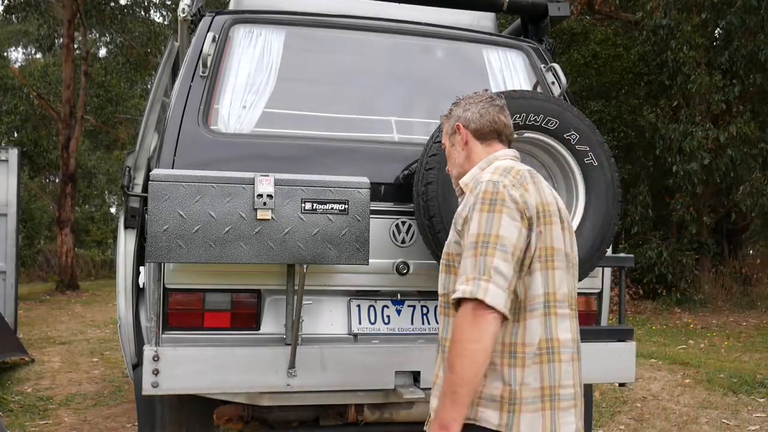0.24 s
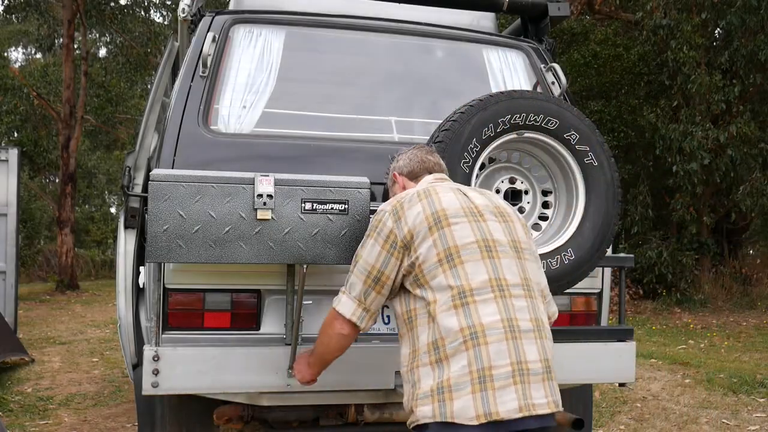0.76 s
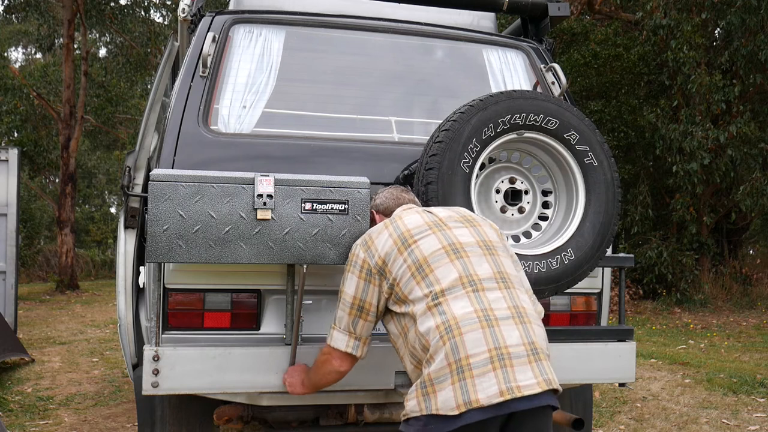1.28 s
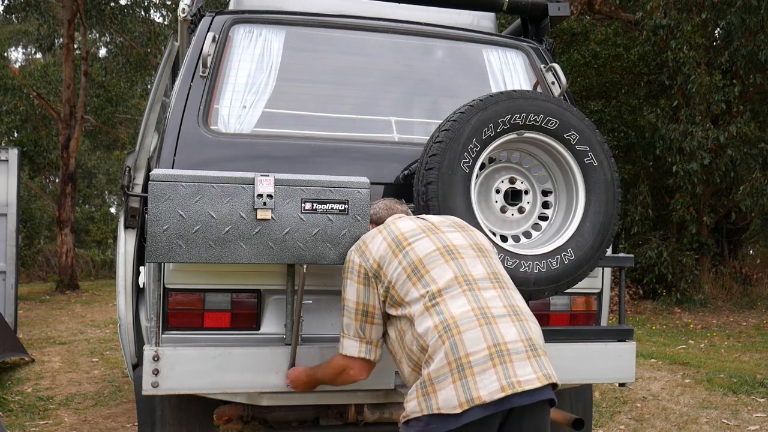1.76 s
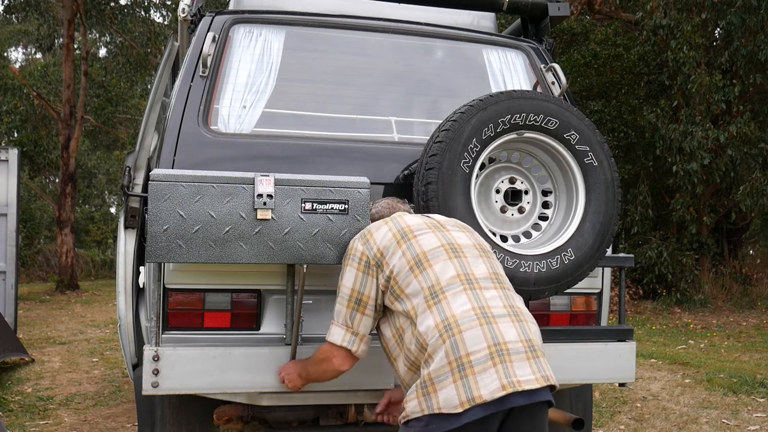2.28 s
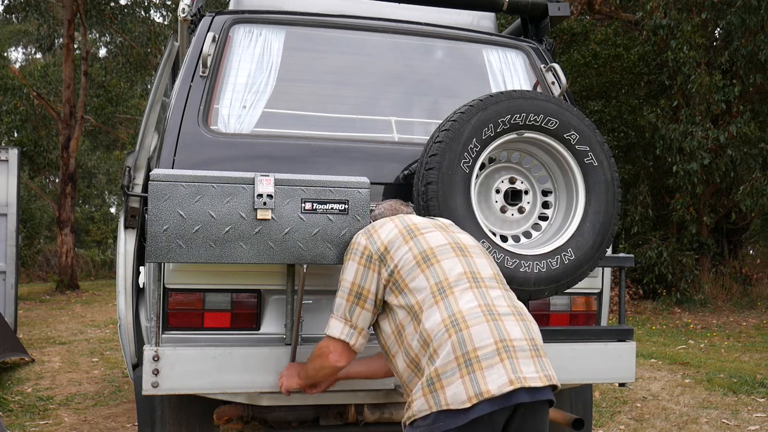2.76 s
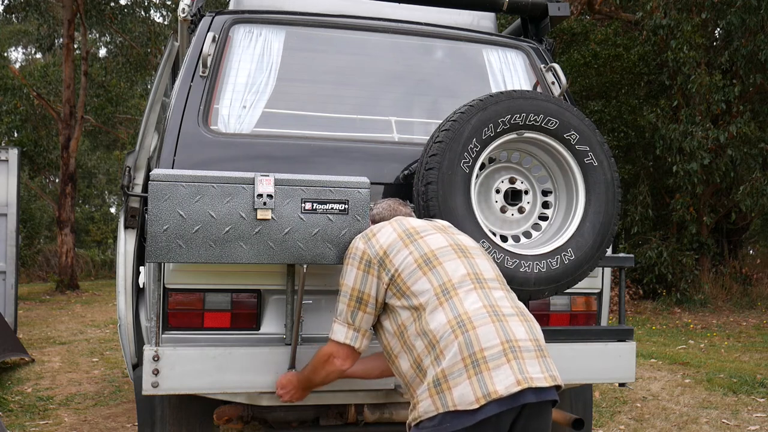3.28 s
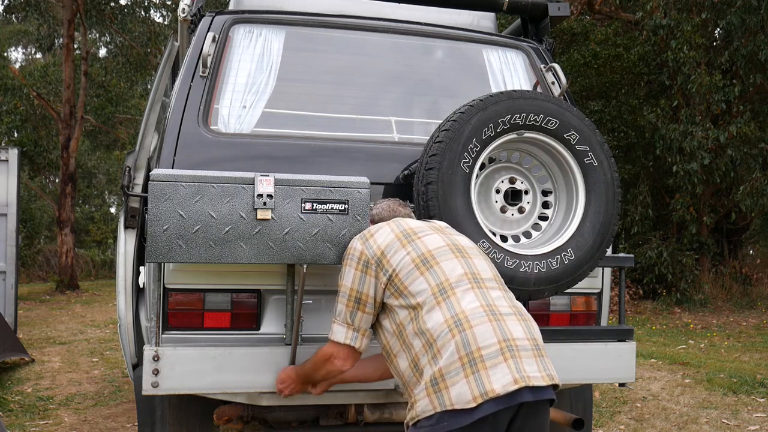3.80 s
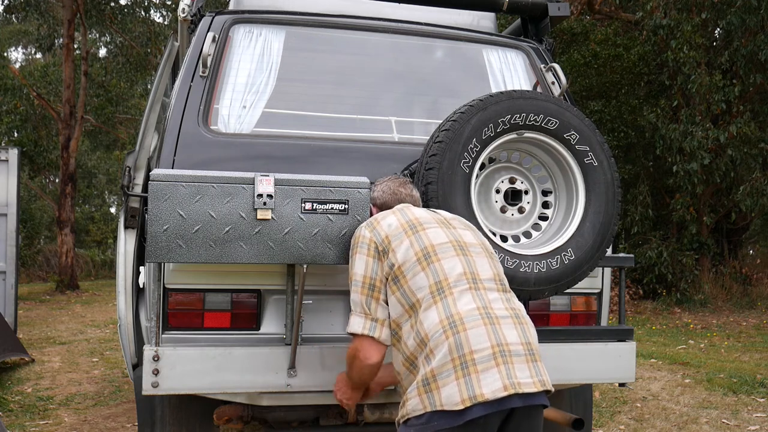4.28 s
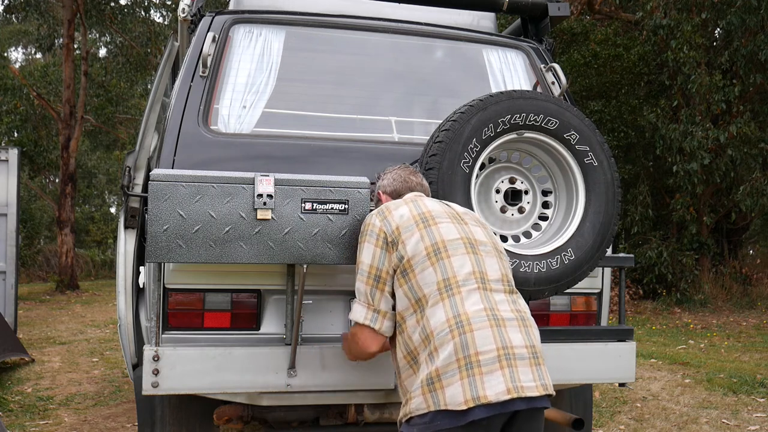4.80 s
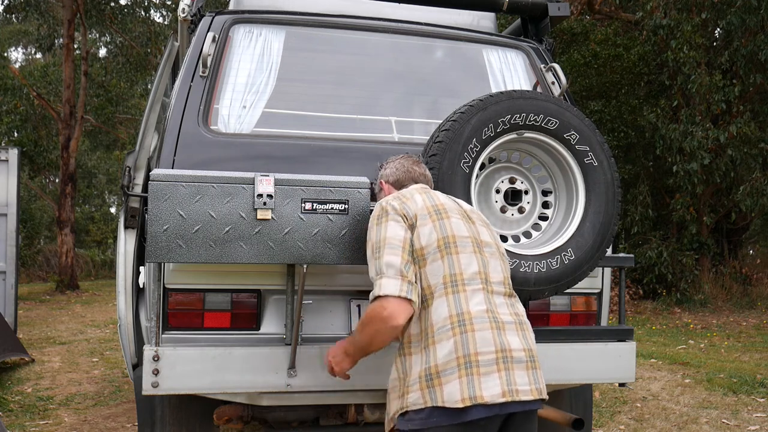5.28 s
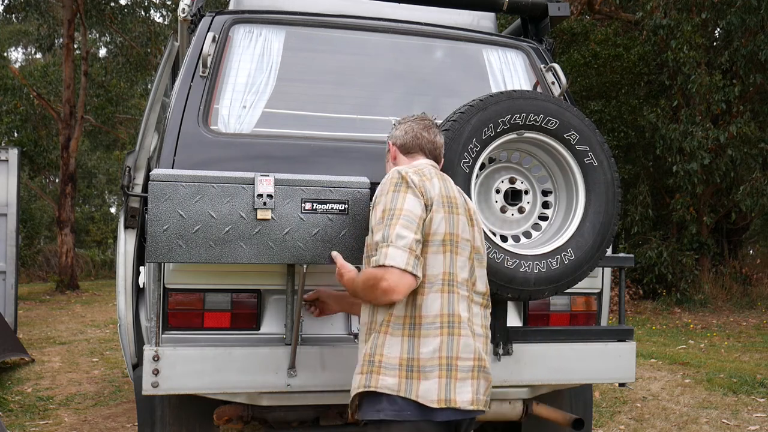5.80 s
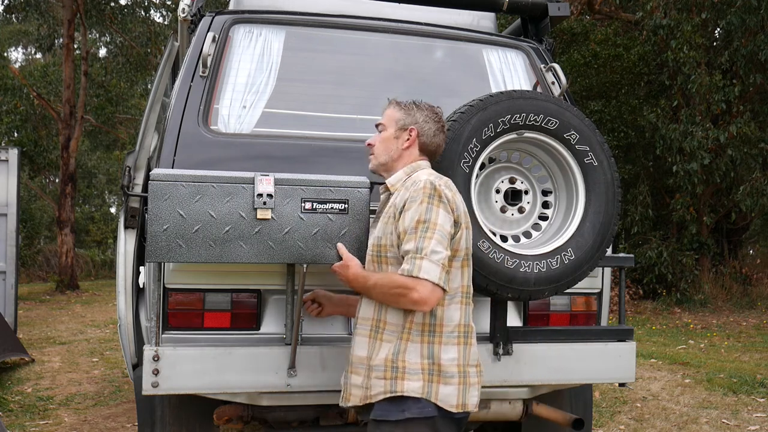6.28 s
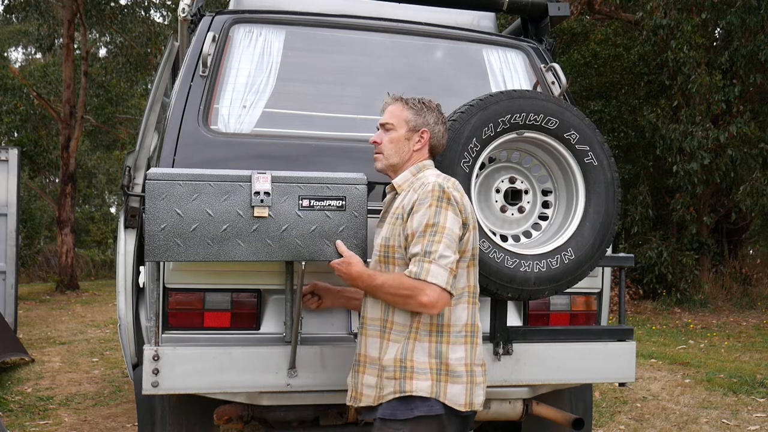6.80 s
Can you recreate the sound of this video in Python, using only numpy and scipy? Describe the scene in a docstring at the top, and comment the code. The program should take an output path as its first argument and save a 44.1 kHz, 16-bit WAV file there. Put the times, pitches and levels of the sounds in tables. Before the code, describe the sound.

Metal latch clicks and scrapes, then a steel swing frame clunks and rattles loose, with a bird chirping and faint insects outdoors.

```python
"""Outdoors behind a van, feet crunch through dry grass and a hand taps and brushes a hollow panel.
A steel latch ticks, from about 2 s its pin clicks and scrapes free, and at 5 s its handle snaps home.
Then a swing-away frame with a sheet-metal box clunks and rattles loose while the pin knocks again.
Each steel part rings when it is hit or rubbed. All along a small bird chirps and insects hiss
among the trees; a far bird whistles once, just before the handle snaps."""
import sys
import numpy as np
from scipy import signal
from scipy.fft import rfft, irfft
from scipy.io import wavfile
from scipy.ndimage import uniform_filter1d

SR = 44100
rng = np.random.default_rng(int(sys.argv[2]) if len(sys.argv) > 2 else 0)


def to_wav(sig):
    """Store sig (one row per channel, or 1-D mono) as 16-bit WAV at the path in sys.argv[1].

    Samples outside -1..1 are clipped; the rate is SR.
    """
    pcm = np.clip(np.atleast_2d(sig), -1, 1) * 32767
    pcm = np.round(pcm).astype(np.int16)
    wavfile.write(sys.argv[1], SR, pcm.T)  # frames by channels


N = 310905
TIME = np.arange(N) / SR


def swing_frame():
    """The tube frame and its sheet-metal box clunk and grind: low notes ring long, high ones die fast."""
    # blows on the frame: time_s, level_db, treble_db, bass_db
    blows = [(5.7, -11, -30, -9.5), (5.743, -17.5, -14.5, -3), (6.153, -31, -12, 1),
             (6.19, -24.5, -36, 3.5), (6.225, -29, -15, -14), (6.564, -23, -12, -25.5),
             (6.628, -21, -20, 0), (6.664, -17, -16, -5), (6.846, -9, -4.5, -20), (6.924, -12.5, -45, 13),
             (6.941, -10.5, -40, 7.5), (6.965, -13.5, -40, 13.5), (6.982, -8.5, -45, 6.5)]
    # rattling in its seat: peak_s, rise_s, hold_s, fall_db_per_s, level_db, treble_db, bass_db
    rattles = [(5.699, 0.011, 0.0012, 273, -24.5, -8.5, -10), (5.752, 0.056, 0.022, 127, -38, -13, 1.5),
               (5.875, 0.028, 0, 226, -42.5, -19, 4), (5.996, 0.022, 0.01, 900, -52.5, -27, 8.5),
               (6.062, 0.069, 0.0063, 246, -61, -8, 9), (6.156, 0.015, 0, 660, -39, -10, -2),
               (6.205, 0.042, 0.011, 163, -32.5, -10, 8), (6.307, .03, 0.016, 102, -46, -24, 9),
               (6.52, 0.028, 0.0018, 197.5, -29, -7, 2.5), (6.547, 0.036, 0.038, 397, -19.5, -8, -9),
               (6.577, 0.018, .005, 494, -19, 5, -5.5), (6.598, 0.079, 0.051, 105, -20, 2.5, -3.5),
               (6.868, 0.039, 0, 156, -17, -4, -1.5), (6.97, 0.1, 0.035, 100, -24, -5.5, 11.5)]
    # its clear ringing notes: pitch_hz, width_hz, level_db
    notes = [(120, 26, -3.5), (202, 52, 0), (254.3, 8.2, -2), (296.4, 22.6, 6), (338.3, 4.8, 3.5),
             (429, 14, -7), (554, 8.9, -23), (650, 50, -5.5), (670, 15, -9), (782, 13, -6.5),
             (850, 4, -6.5), (917, 6.4, -6), (1019, 7, -1.5), (1495, 8.4, -2.5), (1676, 4.8, -9),
             (2110, 14, -38), (2606, 54, -12), (3432, 54, -10.5), (3813, 40, -20), (4600, 23, -46),
             (4950, 45, -29)]
    # its crowd of blended notes: pitch_hz, level_db
    body = [(50, -40), (85, -5.5), (233, -7.5), (272, -46), (338, -7), (403, 5.5), (1030, -2.5),
            (1210, -3.5), (1500, -5), (3030, -14.5), (5010, -23), (10300, -44), (14300, -77), (16000, -61)]
    return ring_steel(blows, rattles, notes, body, fade=(-0.88, 0.57),
                      bass_hz=384, middle_hz=794, treble_hz=3640, ring_s=0.13, shortening=0.77,
                      crowd_size=130, slips_per_s=9000, spread_db=1.5,
                      hit_db=11.5, rub_db=-4, notes_db=5.5, crack_db=-60)


def latch_pin():
    """A small solid pin knocks and slides in its sleeve, making short bright rings."""
    # knocks of the pin: time_s, level_db, treble_db, bass_db
    knocks = [(2.134, -34, 0.5, -19), (2.2264, -28, -7.5, -26), (2.4266, -29, 0.5, -28),
              (2.8298, -25.5, -15, -32), (3.4473, -18, 6, -17), (3.4521, -22.5, 9, -21),
              (3.5776, -28.5, 11, -7), (6.558, -10.5, 9, 9.5), (6.5654, -35, -13, -6.5),
              (6.8469, -12.5, -20, -18), (6.9417, -22.5, -3, 1)]
    # the pin sliding: peak_s, rise_s, hold_s, fall_db_per_s, level_db, treble_db, bass_db
    scrapes = [(2.134, 0.0044, 0.0017, 493, -41, -3, -16), (2.233, 0.02, 0.0024, 236, -36.5, -11.5, -19.5),
               (2.44, 0.012, 0.013, 194, -37, -3, -11.5), (2.466, 0.048, 0.0077, 469, -30.5, -6, -21.5),
               (2.824, 0.029, 0.058, 900, -39.5, -8.5, -17), (2.897, 0.011, 0.066, 333, -40.5, -18.5, -18),
               (3.447, 0.0015, 0.00042, 600, -25.5, 11, -16), (3.49, 0.049, 0.051, 500, -33, 4, -11),
               (3.585, 0.014, 0.0073, 138, -47.5, 12, -3), (3.78, 0.1, 0.064, 118, -57.5, -30, -7.5)]
    # its clear ringing notes: pitch_hz, width_hz, level_db
    notes = [(1530, 34, 2.5), (1945, 48, 3.5), (2228, 21, 12), (2765, 27, 3.5), (4570, 17, -31),
             (4670, 81, 7.5), (5080, 40, 2.5), (5470, 50, 2), (6690, 52, -5), (7310, 26, -0.5),
             (8100, 43, -32), (7950, 77, -15)]
    # its crowd of blended notes: pitch_hz, level_db
    body = [(120, -48), (200, -16.5), (440, -12.5), (836, -10), (1350, -8), (2300, -2), (3600, -8.5),
            (5200, -6.5), (6400, -18), (8270, -9.5), (10900, -33), (12800, -20), (16000, -43)]
    return ring_steel(knocks, scrapes, notes, body, fade=(-1.06, 0.16),
                      bass_hz=630, middle_hz=2220, treble_hz=8600, ring_s=0.068, shortening=0.35,
                      crowd_size=130, slips_per_s=6000, spread_db=0.5,
                      hit_db=13.5, rub_db=-4, notes_db=-3, crack_db=-5.5)


def latch_handle():
    """A spring snaps the handle home, and it chatters briefly."""
    # the snap: time_s, level_db, treble_db, bass_db
    snap = [(5.1051, -15.5, 10.5, -11)]
    # the chatter: peak_s, rise_s, hold_s, fall_db_per_s, level_db, treble_db, bass_db
    chatter = [(5.097, .006, .004, 900, -48, -10, 4), (5.114, 0.01, 0, 1300, -14.5, 2.5, -16.5),
               (5.131, .004, 0.0014, 1003, -26, -8.5, -8.5), (5.161, 0.02, 0.023, 500, -37, -19, -5.5),
               (5.203, .02, 0.098, 300, -55, 0, -5)]
    # its clear ringing notes: pitch_hz, width_hz, level_db
    notes = [(1004, 14, -7.5), (1482, 19, 4), (2060, 12.6, -11.5), (2540, 14, -10), (3063, 40, -17),
             (3676, 61, -10.5), (4740, 31, -7.5), (5240, 26, -12), (6190, 25, -17), (6750, 61, -10),
             (7450, 63, -12.5), (8240, 66, -9), (8720, 48, -15), (9530, 42, -21), (11550, 21, -34)]
    # its crowd of blended notes: pitch_hz, level_db
    body = [(59, -55), (100, -17), (583, -0.5), (768, -10.5), (1130, 2.5), (1280, -31), (1480, -13),
            (1800, -11), (4380, -21), (5080, -14), (5770, -30), (8110, -31), (16000, -30)]
    return ring_steel(snap, chatter, notes, body, fade=(-0.78, 0.17),
                      bass_hz=490, middle_hz=1680, treble_hz=8300, ring_s=0.066, shortening=0.49,
                      crowd_size=70, slips_per_s=5200, spread_db=2.5,
                      hit_db=16, rub_db=-2, notes_db=2, crack_db=-20)


def ring_steel(hits, rubs, notes, body, fade, bass_hz, middle_hz, treble_hz, ring_s, shortening,
               crowd_size, slips_per_s, spread_db, hit_db, rub_db, notes_db, crack_db):
    """Hits, and the tiny slips of rubbing, ring a steel part at its own natural notes (its modes)."""
    # the brief crack of steel on steel: pitch_hz, level_db
    crack = [(3500, 5), (6000, 3), (9000, -22), (13000, -15.5)]
    crowd = np.geomspace(body[1][0], 15500, crowd_size) * (1 + 0.0088 * rng.standard_normal(crowd_size))
    # modes: pitch_hz, ring_s, level_db; higher crowd modes stand for wider bands, so they get a boost
    modes = [(hz, ring_s * (hz / middle_hz) ** -shortening, at(body, hz) + 10 * np.log10(hz / middle_hz))
             for hz in crowd]
    modes += [(hz, np.log(1000) / np.pi / width, db + notes_db) for hz, width, db in notes]
    modes += [(hz, 0.006, db + crack_db) for hz, db in crack]
    hit_s, hit_level, hit_treble, hit_bass = np.transpose(hits)
    hit_at = (hit_s * SR).astype(int)
    luck = rng.standard_normal((len(hits), len(modes)))  # every hit lands a little differently
    rub_level, rub_treble, rub_bass = stroke_curves(rubs, fade)
    usual_treble, usual_bass = np.median(rubs, axis=0)[-2:]
    start, end = hit_at.min() - SR // 10, min(hit_at.max() + SR, N)
    slips = random_clicks(slips_per_s, spread_db)
    rub_gain = undb(rub_level[start:end] + rub_db)
    lags = rng.integers(0, 300, len(modes))  # slips reach each mode by its own path through the steel
    out = np.zeros(N)
    for k, (hz, decay_s, db) in enumerate(modes):
        high, low = share(hz, middle_hz, treble_hz), share(hz, middle_hz, bass_hz)
        # the grip shifts as the part moves, so each mode swells and fades on its own
        grip = undb(2.5 * np.interp(TIME[start:end], np.arange(100) / 14, rng.standard_normal(100)))
        rub_tone = high * (rub_treble[start:end] - usual_treble) + low * (rub_bass[start:end] - usual_bass)
        push = slips[start - lags[k]:end - lags[k]] * rub_gain * grip * undb(rub_tone)
        hit_tone = high * (hit_treble - usual_treble) + low * (hit_bass - usual_bass)
        strength = undb(hit_level + hit_db + 2.8 * luck[:, k] + hit_tone)
        push[hit_at - start + lags[k] // 4] += np.sign(luck[:, k]) * strength
        out[start:end] += undb(db) / np.sqrt(decay_s * SR) * ring(push, min(hz, .45 * SR), decay_s)
    return out


def dry_grass():
    """Feet and clothes snap dry stalks: thousands of tiny clicks blend into a crunch."""
    # brushes through the grass: peak_s, rise_s, hold_s, fall_db_per_s, level_db, treble_db
    rustles = [(.118, 0.046, 0.005, 700, -43.5, 3), (.368, 0.012, 0.0026, 900, -46, -20),
               (.648, 0.029, 0, 800, -44, 0), (.962, 0.071, 0, 300, -61.5, 8),
               (1.188, 0.037, 0.00066, 750, -39, 8), (1.746, 0.024, 0.011, 92, -62, 9),
               (5.34, 0.18, 0.067, 250, -53, 2), (5.998, 0.08, 0.0012, 1499, -42, 0)]
    # tone of the stalks: pitch_hz, level_db
    stalk_tone = [(59, -1), (100, -9.5), (752, -3), (1010, -6.5), (1130, -4), (2630, -12.5), (10700, -28),
                  (12900, -26.5), (16000, -32)]
    # faint shuffling between steps: time_s, level_db
    shuffling = [(0, -54.5), (.08, -55.5), (.25, -57), (.55, -63.5), (.78, -60.5), (1.05, -68.5),
                 (1.14, -56.5), (1.3, -73), (1.55, -76), (1.9, -68.5), (2.1, -66), (5.15, -109), (5.2, -54),
                 (5.45, -65), (5.68, -59), (5.75, -78)]
    level_db, treble_db = stroke_curves(rustles, fade=(-0.54,))
    shuffle = undb(np.interp(TIME, *np.transpose(shuffling)) + 2 * wander(30))
    crunch = normalise(colour(random_clicks(7000, 1.07), stalk_tone))
    highs = signal.sosfilt(signal.butter(2, 5000, "high", fs=SR, output="sos"), crunch)
    lows = crunch - highs
    return (undb(level_db) + shuffle) * lows + (undb(level_db + treble_db) + shuffle * undb(3)) * highs


def heels_and_latch_ticks():
    """Heels thud low and the latch ticks high, each one a single note that dies quickly."""
    # heels landing: time_s, level_db, pitch_hz
    thuds = [(0.149, -38, 130), (0.665, -34, 200), (6.011, -55, 268)]
    # small ticks of the latch: time_s, level_db, pitch_hz, ring_s
    ticks = [(1.466, -42.5, 5500, 0.005), (1.608, -42.5, 4800, 0.0042), (1.997, -55, 2780, 0.077)]
    out = np.zeros(N)
    for time_s, db, hz, ring_s in [(*thud, .025) for thud in thuds] + ticks:
        click = undb(db) * (np.arange(N) == int(time_s * SR))
        out += ring(click, hz, ring_s)
    return out


def hollow_panel():
    """A soft tap and a lightly dragged hand set a hollow panel ringing."""
    # the tap: time_s, level_db
    taps = [(1.124, -43.5)]
    # the dragging hand: time_s, level_db
    drag = [(1.5, -97), (1.65, -90), (1.85, -89), (2.0, -105), (2.15, -99)]
    # the panel's notes: pitch_hz, level_db, ring_s
    notes = [(514, -9, 0.88), (610, -16, 0.96), (549, -11, 0.69), (680, -32, .15), (235.7, -16, 0.96),
             (442, -18, 0.89)]
    touch = rng.standard_normal(N) * undb(np.interp(TIME, *np.transpose(drag), left=-150, right=-150))
    for time_s, db in taps:
        touch[int(time_s * SR)] += undb(db)
    return sum(undb(db) * ring(touch, hz, ring_s) for hz, db, ring_s in notes)


def near_bird():
    """Each hoarse chirp is ten harmonics (multiples of a pitch) that rise and fall, shaped by the beak."""
    # the chirps: start_s, length_s, top_pitch_hz, level_db, brightness_db_per_harmonic
    chirps = [(0.334, 0.06, 1502, -37, -2.7), (2.747, 0.068, 1500, -42, -3),
              (3.172, 0.062, 1513, -36, -0.2), (3.598, 0.065, 1436, -41, -2.5),
              (4.127, 0.062, 1508, -37, 0), (4.794, 0.059, 1507, -36, 0), (6.426, 0.063, 1458, -38.5, -2)]
    # how the beak shapes the voice: pitch_hz, gain_db
    beak = [(1500, -26), (2900, -36), (3500, -11), (4500, -11), (5200, -1.5), (6000, -1), (6800, -12),
            (8500, -14.5), (10000, -15.5), (12000, -30), (15000, -47)]
    # the rise and fall of a chirp: share_of_length, share_of_top_pitch
    arch = [(0, .7), (.1, .8), (.2, .88), (.36, .97), (.55, 1), (.72, .995), (.86, .955), (1, .78)]
    # how hard the bird sings: share_of_length, level_db, brightness_db_per_harmonic
    effort = [(0, -24, -2), (.15, -8, 1), (.3, 0, 1), (.55, -1, 0), (.75, -5, -3), (.9, -8, -6),
              (1, -16, -7)]
    effort_at, effort_db, effort_brightness = np.transpose(effort)
    flutters = [wander(300) for _ in range(10)]
    waver = 1 + 0.012 * wander(900)
    breath = normalise(colour(rng.standard_normal(N), beak))
    out = np.zeros(N)
    for start_s, length_s, top_hz, db, chirp_brightness in chirps:
        on = (TIME >= start_s) & (TIME < start_s + length_s)
        progress = (TIME[on] - start_s) / length_s
        pitch = top_hz * uniform_filter1d(np.interp(progress, *np.transpose(arch)), size=60) * waver[on]
        phase = 2 * np.pi * np.cumsum(pitch) / SR
        soft_ends = np.clip(10 * np.minimum(progress, 1 - progress), 0, 1)
        loudness = undb(db + np.interp(progress, effort_at, effort_db)) * soft_ends
        brightness = chirp_brightness + np.interp(progress, effort_at, effort_brightness)
        out[on] += loudness * undb(-17) * breath[on]  # air leaking past the voice
        for k, flutter in enumerate(flutters, 1):
            harmonic_db = at(beak, k * pitch) + brightness * np.clip(k - 4, -1, 2) + 3 * flutter[on]
            out[on] += loudness * undb(harmonic_db) * np.sin(k * phase + k * k)
    return out + echo(out, -9, ring_s=.03, delay_s=.002)  # twigs and ground close to the perch


def far_bird():
    """One falling whistle, blurred by the leaves."""
    # the whistle's path: time_s, pitch_hz, level_db
    whistle = [(4.88, 5230, -75), (4.894, 5060, -69), (4.914, 4760, -59), (4.94, 4600, -64),
               (5.03, 4600, -76.5)]
    time_s, hz, db = np.transpose(whistle)
    on = (TIME > time_s[0]) & (TIME < time_s[-1])
    phase = 2 * np.pi * np.cumsum(np.interp(TIME, time_s, hz)) / SR
    return on * undb(np.interp(TIME, time_s, db) + 10 * wander(200)) * np.sin(phase)


def insects_and_leaves():
    """Sixteen insects pulse, each on its own pitch, over slowly swelling far-off leaves and hum."""
    # tone of the insect chorus: pitch_hz, level_db
    insect_tone = [(5600, -23), (6400, -17), (7100, -7.5), (7600, -0.5), (8200, -1), (8700, -7.5),
                   (9200, -20), (9800, -66)]
    # tone of the leaves and hum: pitch_hz, level_db
    leaf_tone = [(25, -28), (60, -6.5), (170, -4.5), (400, -6), (900, -9), (1500, -12), (3000, -18),
                 (5300, -19.5), (9500, -26), (16000, -28.5)]
    leaves = colour(rng.standard_normal(N), leaf_tone)
    below_6_khz = signal.sosfilt(signal.butter(4, 6000, fs=SR, output="sos"), leaves)
    leaves *= undb(-64) / np.std(below_6_khz)
    insects = sum(normalise(ring(rng.standard_normal(N), hz, 0.01)) * undb(4.6 * wander(60))
                  for hz in np.linspace(5800, 9400, num=16))
    return leaves * undb(.5 * wander(1.21)) + normalise(colour(insects, insect_tone)) * undb(-60)


def echo(sound, db, ring_s, delay_s):
    """Trees and ground scatter the sound back as a thin, fading wash."""
    t = TIME[:SR]
    wash = rng.standard_normal(SR) * np.exp(-np.log(1000) * t / ring_s) * (t > delay_s)
    return undb(db) * signal.fftconvolve(sound, wash / np.sqrt(np.sum(wash ** 2)))[:N]


def stroke_curves(strokes, fade):
    """Level and tone curves in dB: rubbing strokes rise, hold and fall, and the loudest one wins."""
    rise_db, fall_db = 20, 40  # a stroke starts and ends this far under its peak
    curves = np.zeros((1 + len(fade), N))
    curves[0] = -120
    for peak_s, rise_s, hold_s, fall_db_per_s, db, *tones in strokes:
        fallen = fall_db_per_s * np.maximum(TIME - peak_s - hold_s, 0)
        under = fallen + rise_db * np.maximum(peak_s - TIME, 0) / rise_s
        on = (under < np.where(TIME < peak_s, rise_db, fall_db)) & (db - under > curves[0])
        # fade is how many dB the treble, then the bass, shift for each dB the stroke falls
        curves[:, on] = [db - under[on]] + [tone + shift * fallen[on] for tone, shift in zip(tones, fade)]
    return curves


def ring(push, hz, ring_s):
    """One note, with little bass, that dies away by 60 dB in ring_s after each push."""
    decay, angle = np.exp(-np.log(1000) / (ring_s * SR)), 2 * np.pi * hz / SR
    return signal.lfilter([1, 0, -1], [1, -2 * decay * np.cos(angle), decay * decay], push) / 2


def random_clicks(per_s, spread_db):
    """Clicks at random times, most small and a few large."""
    hit = rng.random(N) < per_s / SR
    return normalise(hit * rng.standard_normal(N) * undb(spread_db * rng.exponential(size=N)))


def wander(per_s):
    """A smooth random curve that heads for a new value per_s times a second."""
    hold = int(SR / per_s)
    stairs = np.repeat(rng.standard_normal(N // hold + 1), hold)
    return uniform_filter1d(uniform_filter1d(stairs, hold), hold)[:N]


def colour(sound, tone):
    """Filter a sound through a table of pitch_hz, gain_db."""
    size = 4096
    hz = np.maximum(np.arange(size // 2 + 1), 1) * SR / size
    cepstrum = irfft(np.log(undb(at(tone, hz))))
    # folding the second half onto the first keeps the filter from sounding ahead of its input
    cepstrum[1:size // 2] *= 2
    cepstrum[size // 2 + 1:] = 0
    return signal.fftconvolve(sound, irfft(np.exp(rfft(cepstrum))))[:N]


def at(tone, hz):
    """Look up the dB of a tone table at any pitch, with octaves evenly spaced."""
    pitches, db = np.transpose(tone)
    return np.interp(np.log(hz), np.log(pitches), db)


def share(hz, from_hz, to_hz):
    """How far a pitch lies from from_hz (0) toward to_hz (1)."""
    return np.clip(np.log(hz / from_hz) / np.log(to_hz / from_hz), 0, 1)


def undb(db):
    """Turn decibels into a plain multiplier."""
    return 10 ** (np.asarray(db) / 20)


def normalise(sound):
    """Scale a sound to an average power of 1."""
    return sound / np.sqrt(np.mean(sound ** 2))


def scene():
    """Mix in stereo: mid is what both channels share, side is the scattered sound that sets them apart."""
    # stereo width of the sounds at the van: pitch_hz, gain_db
    van_width = [(60, -21), (110, -27), (200, -45), (380, -38), (700, -34), (1290, -24.5), (2380, -26.5),
                 (4400, -20.5), (8120, -18), (15000, -23)]
    # stereo width of the background: pitch_hz, gain_db
    background_width = [(60, -25), (110, -18), (200, -18), (380, -16.5), (700, -14.5), (1290, -16),
                        (2380, -12), (4400, -5.5), (8120, -20), (15000, 6)]
    van = latch_pin() + latch_handle() + swing_frame()
    van += dry_grass() + heels_and_latch_ticks() + hollow_panel()
    # parts this small give off no deep bass
    van = signal.sosfilt(signal.butter(3, 85, "high", fs=SR, output="sos"), van)
    birds = near_bird() + far_bird()
    mid = van + echo(van, -15, ring_s=0.23, delay_s=0.016)
    mid += birds + echo(birds, -11.5, ring_s=.42, delay_s=0.034)
    mid += insects_and_leaves()
    side = colour(echo(van, 0.1, ring_s=0.039, delay_s=0.00095), van_width)
    side += echo(birds, -27, ring_s=.42, delay_s=0.00083)
    side += colour(insects_and_leaves(), background_width)
    return np.array([mid + side, mid - side])


def record(dry):
    """Cut the very highest treble, above 15900 Hz."""
    return signal.sosfilt(signal.ellip(8, .2, 70, 15900, fs=SR, output="sos"), dry)


dry = scene()
out = record(dry)
to_wav(out)
```